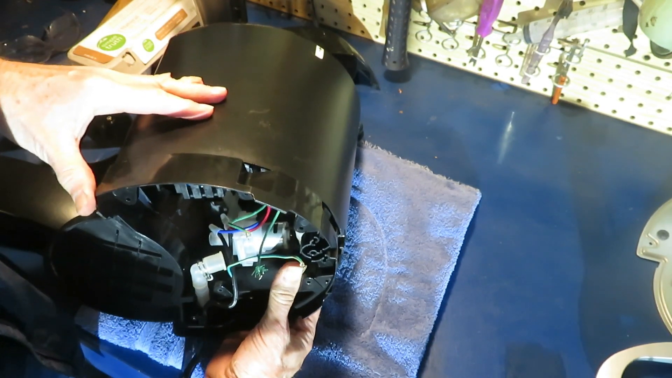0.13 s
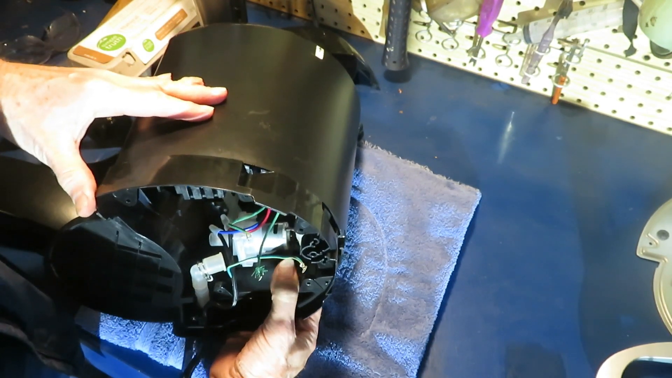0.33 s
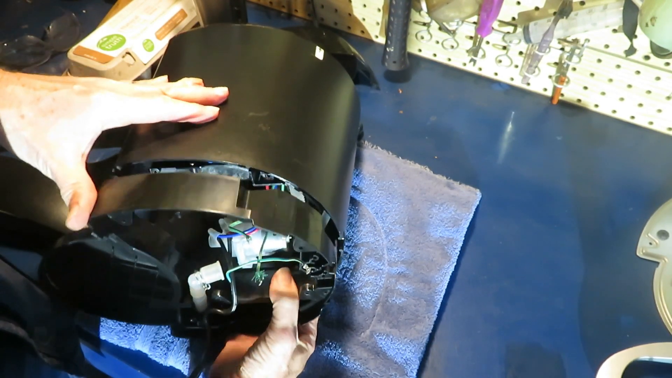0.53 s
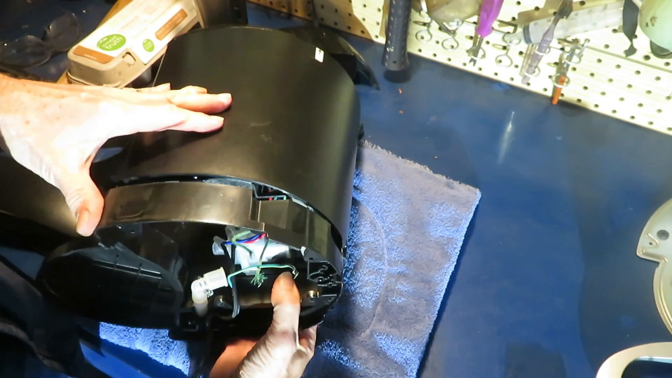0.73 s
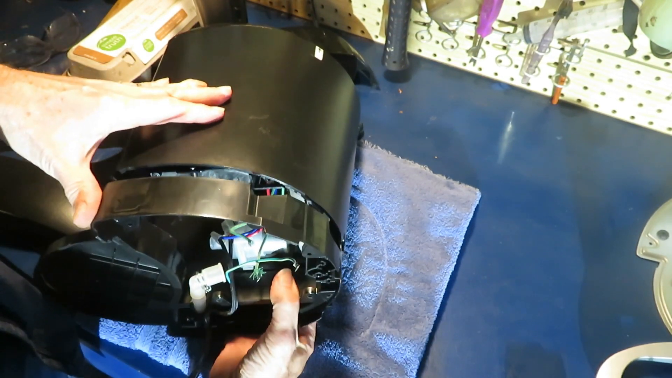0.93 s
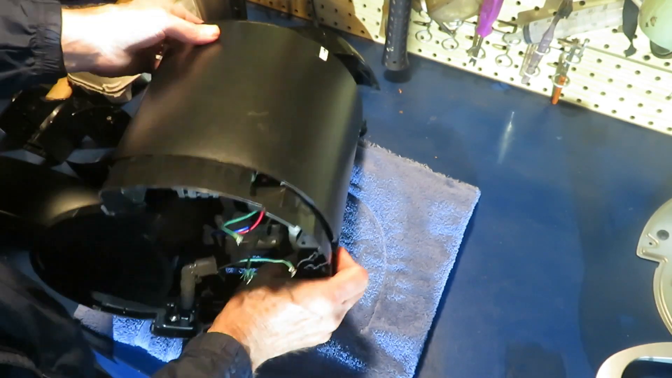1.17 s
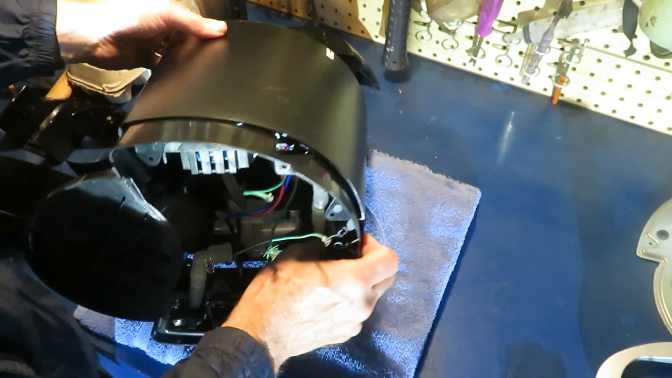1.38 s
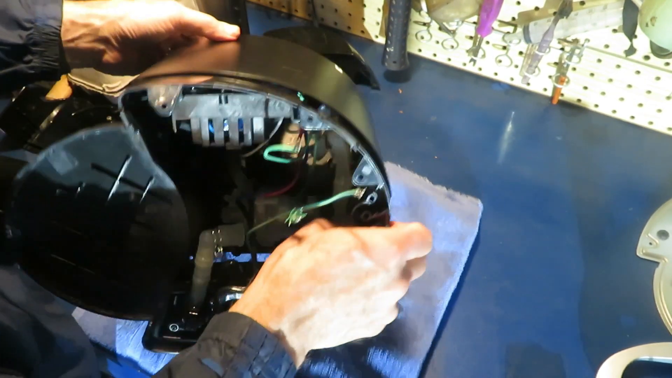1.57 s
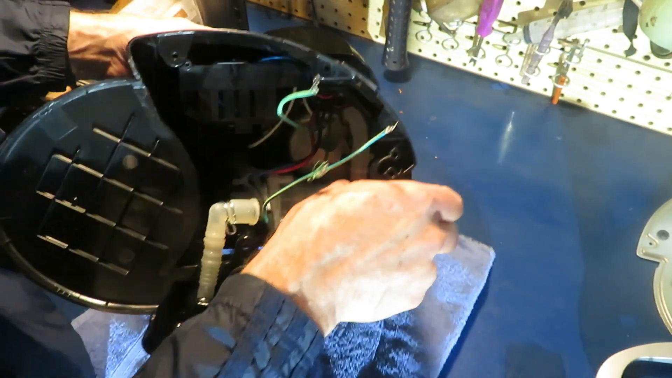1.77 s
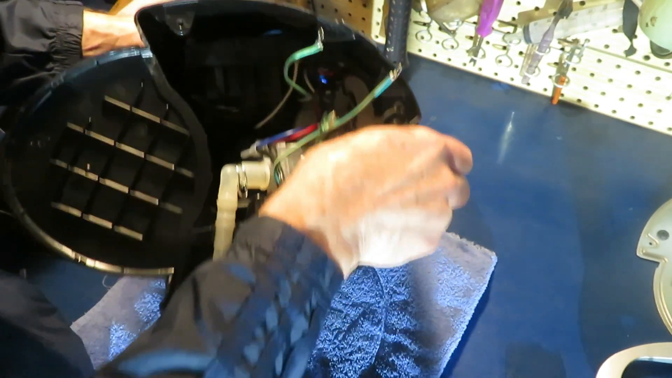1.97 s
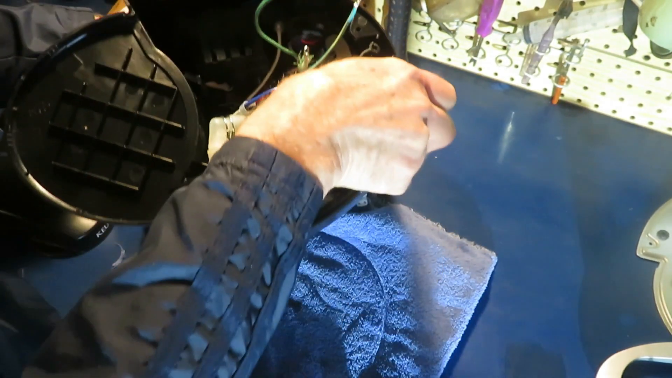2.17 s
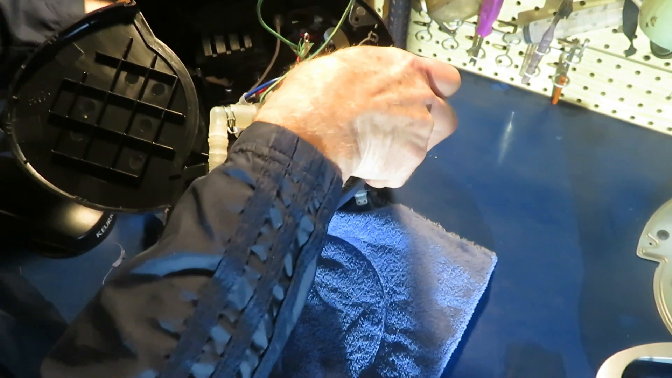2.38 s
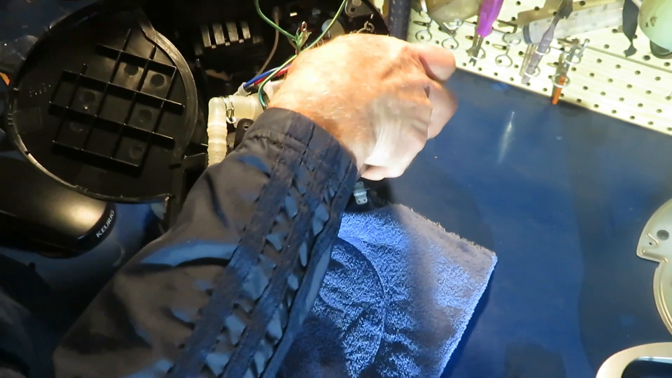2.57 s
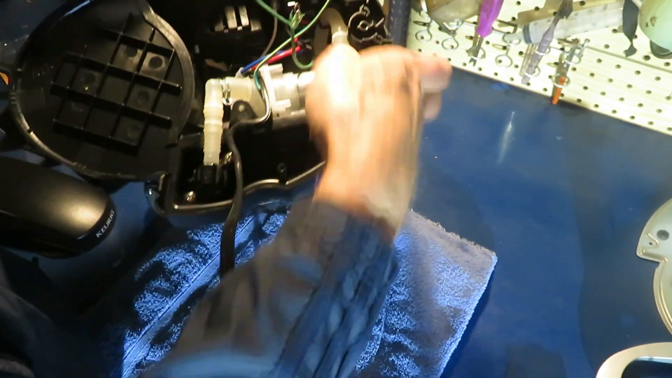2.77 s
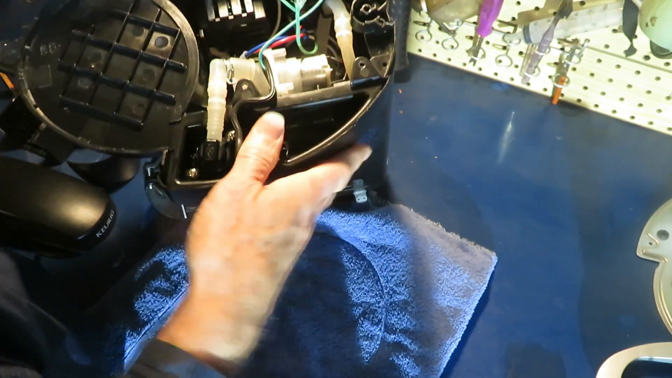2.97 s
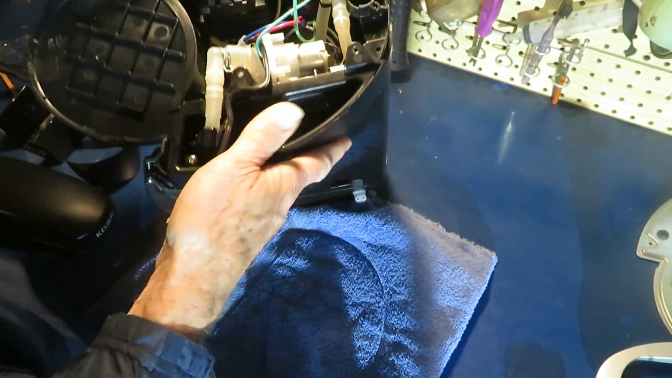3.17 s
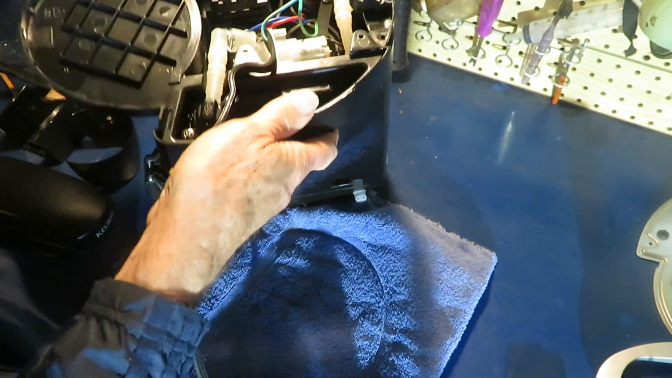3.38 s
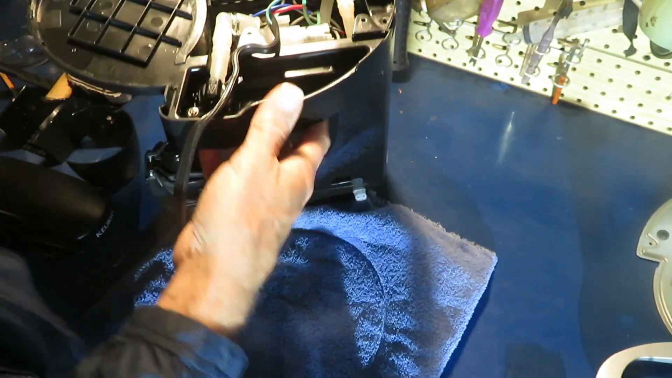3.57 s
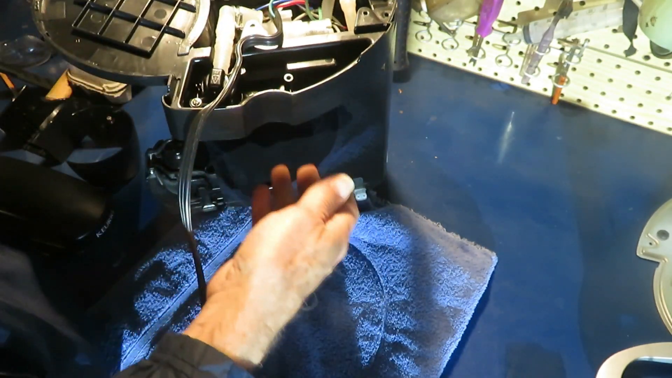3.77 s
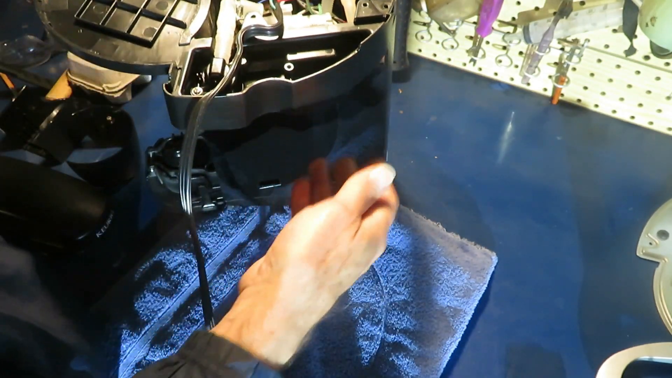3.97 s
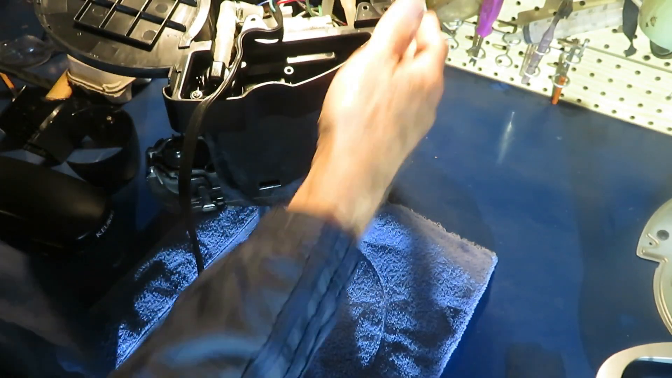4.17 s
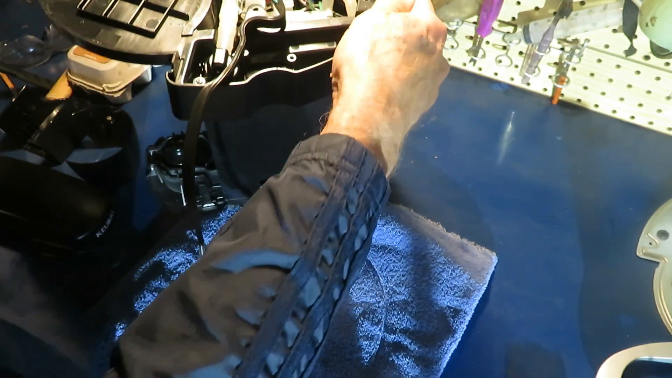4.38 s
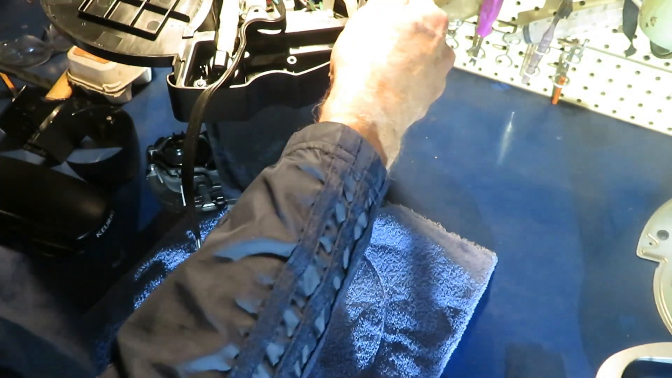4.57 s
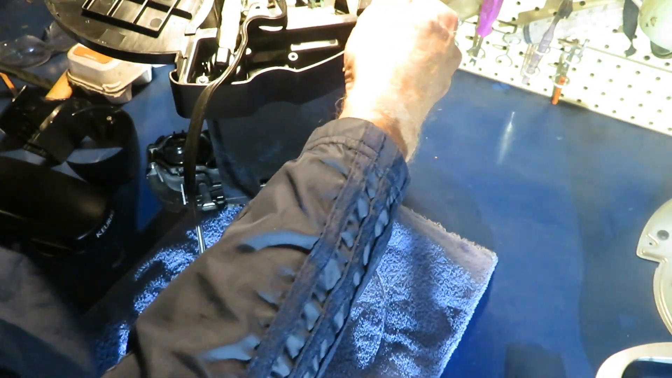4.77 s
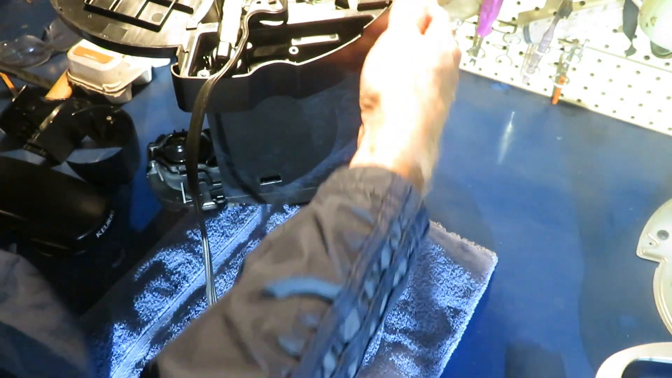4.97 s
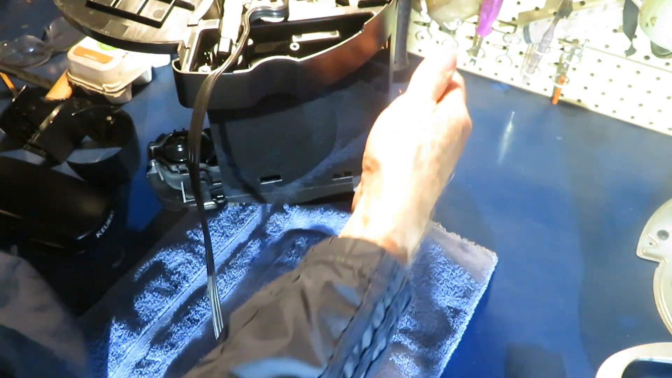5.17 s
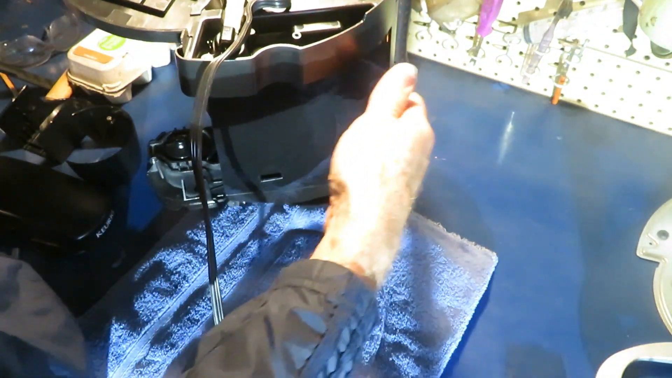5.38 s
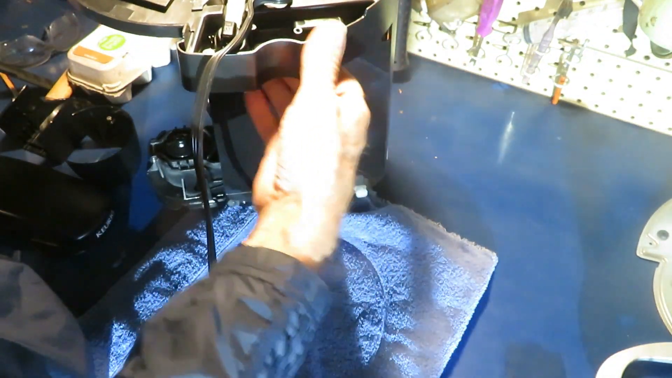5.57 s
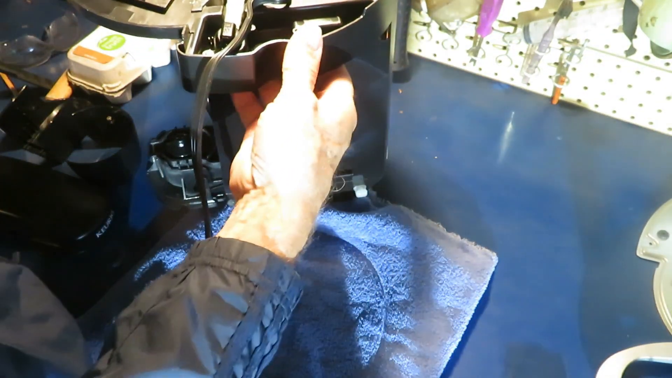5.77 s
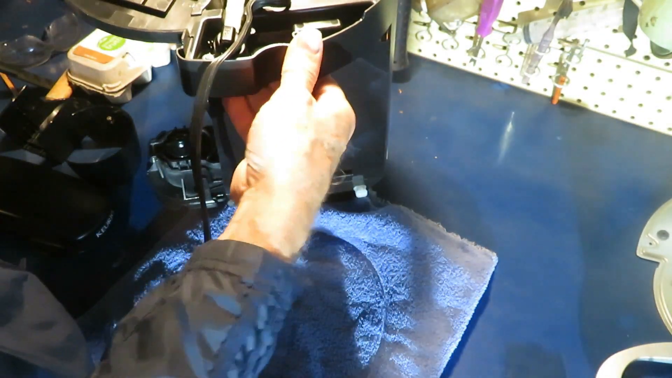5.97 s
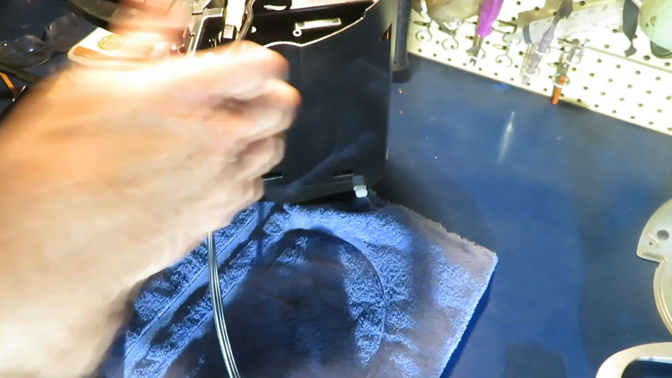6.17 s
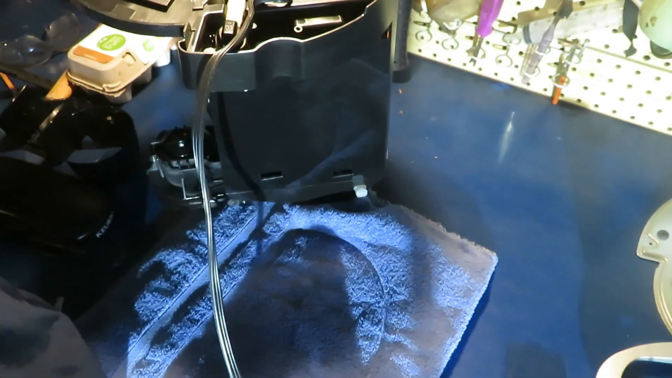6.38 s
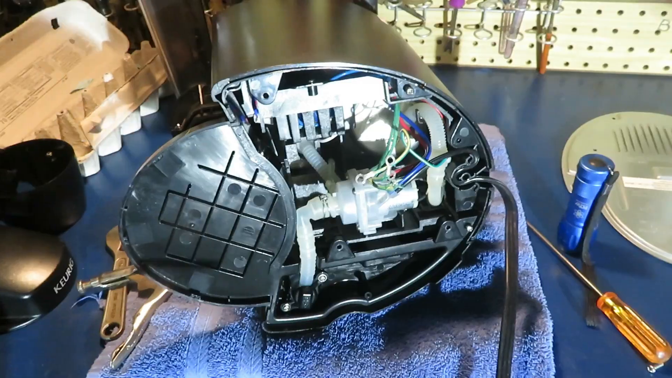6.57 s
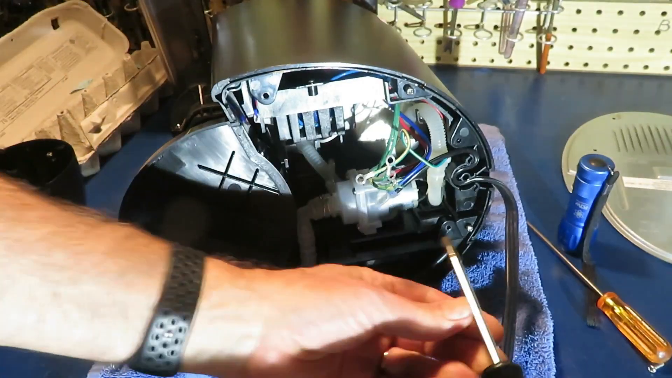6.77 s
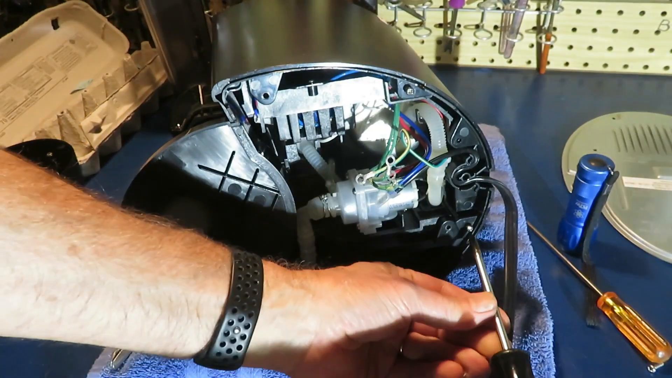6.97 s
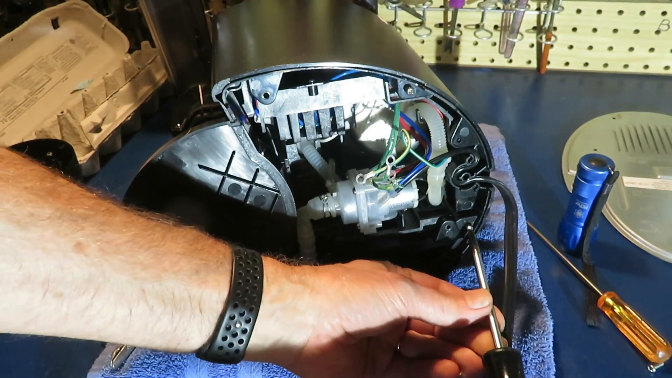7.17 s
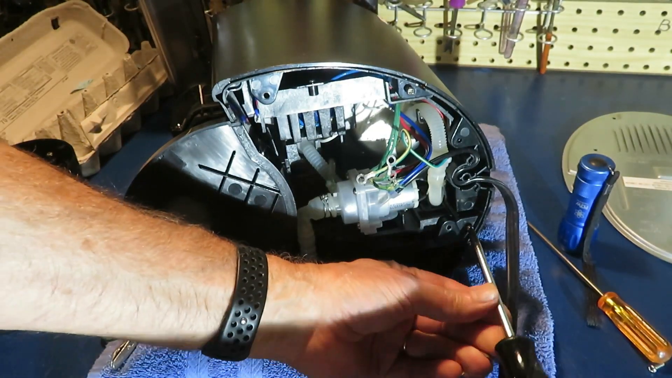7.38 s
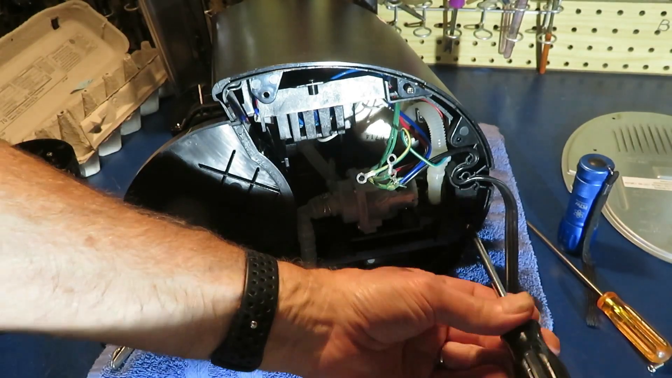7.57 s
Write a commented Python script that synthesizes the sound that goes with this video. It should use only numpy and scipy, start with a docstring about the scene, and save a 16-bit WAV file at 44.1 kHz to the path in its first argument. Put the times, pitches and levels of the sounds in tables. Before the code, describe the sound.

Close stereo pickup at a workbench in a small room. A hollow plastic appliance shell pops apart with bright cracks, then knocks, thuds and clicks as it is turned over, while a sleeve and hand rub and scuff it. Low rumble and hum lie beneath. Late on, the background cuts abruptly to near-silence, and a screwdriver taps very faintly inside the casing.

```python
"""Prying open a hollow plastic casing

The casing of a small appliance is pried open and turned over on a towel at a workbench in a small room.
Snaps, knocks and taps are short bursts of force that ring the shell; a sleeve and a hand rub it as
trembling noise. Coloured noise makes the room air and a low hum, and a sine makes a deep drone.
Near the end the background drops away abruptly and a screwdriver taps faintly in the casing."""
import sys
import numpy as np
from scipy import signal
from scipy.fft import rfft, irfft, next_fast_len
from scipy.io import wavfile
from scipy.ndimage import map_coordinates

SR = 44100
rng = np.random.default_rng(int(sys.argv[2]) if len(sys.argv) > 2 else 0)


def persist_wave(psi):
    """Save psi, clipped to +-1, as 16-bit WAV."""
    counts = np.round(np.clip(psi, -1, 1) * 32767).astype(np.int16)
    wavfile.write(sys.argv[1], SR, np.atleast_2d(counts).T)


N = 336924

# edges of the bands in which a touch gets its colour [Hz]
BAND_EDGES = [150, 450, 900, 2000, 4000, 8000, 16000]
# main ringing tones (modes) of the casing: (frequency [Hz], width [Hz], relative level [dB])
SHELL_MODES = [(213.3, 25, 0), (302, 47, 2.5), (407, 19, -1), (431.3, 56, -7.5), (574.6, 20, -10),
               (679, 30, 4.5), (768, 10, -13), (854, 35, -17), (1055, 39, 3.5), (1146, 50, -15),
               (1600, 81, 3.5), (1737, 88, -11), (2200, 140, -14.5), (2529, 57, -1.5), (2860, 39, -16),
               (3690, 100, -8.5), (3986, 96, -22.5), (5230, 85, -27), (6344, 160, -38)]
# colour of cloth and skin on plastic: (frequency [Hz], relative level [dB per Hz])
CLOTH_COLOUR = [(180, -32), (300, -8.5), (379, -1.5), (486, -9), (614, -2), (737, -14.5), (870, -0.5),
                (1040, -6.5), (2320, -7.5), (4300, -14.5), (6200, -19), (9550, -24.5), (13500, -23.5),
                (15000, -37), (16000, -57.5)]
# colour of knocks and light finger touches: (frequency [Hz], relative level [dB])
KNOCK_BANDS = [(640, 0), (1340, -0.5), (2830, -5.5), (5660, -16), (11300, -27.5)]
DROP_S = 6.57  # when the background drops away


def amp(db):
    """Turn decibels into a gain."""
    return 10 ** (np.asarray(db) / 20)


def unit(x):
    """Scale a sound to an average (rms) level of 1."""
    return x / np.sqrt(np.mean(x ** 2) + 1e-20)


def along(points, hz):
    """Read a curve of (Hz, value) points, straight on a log frequency axis."""
    f, v = np.transpose(points)
    return np.interp(np.log(hz + 1), np.log(f + 1), v)


def curves(rows):
    """Give one value per sample for each column after the time."""
    s, *cols = np.transpose(rows)
    return [np.interp(np.arange(N) / SR, s, c) for c in cols]


def wobble(rate):
    """A smooth random curve with this many random points a second."""
    points = rng.standard_normal(int(N * rate / SR) + 4)
    return map_coordinates(points, [np.arange(N) * rate / SR])


def filtered(x, response):
    """Multiply the spectrum of a sound by a response that depends on frequency."""
    m = next_fast_len(N + SR // 2)
    return irfft(rfft(x, m) * response(np.fft.rfftfreq(m, 1 / SR)), m)[..., :N]


def noise(spectrum):
    """Steady coloured noise with an average (rms) level of 1."""
    return unit(filtered(rng.standard_normal(N), lambda hz: amp(along(spectrum, hz))))


def coloured(x, points):
    """Colour a short sound by (Hz, dB) points without smearing it backwards (minimum phase)."""
    n = len(x)
    cepstrum = irfft(np.log(amp(along(points, np.fft.rfftfreq(n, 1 / SR)))), n)
    cepstrum[1:n // 2] *= 2
    cepstrum[n // 2 + 1:] = 0
    return irfft(rfft(x) * np.exp(rfft(cepstrum)), n)


def dying(t60s, size):
    """Noise in which each frequency dies away at its own speed."""
    hz, t, z = signal.stft(rng.standard_normal(size), SR, nperseg=128)
    fade = amp(-60 * t / along(t60s, hz)[:, None])
    return signal.istft(z * fade, SR, nperseg=128)[1][:size]


def swells(rows, fade_db_per_s):
    """Gain that rises to each (s, dB) crest and falls away, both at a steady slope."""
    t = np.arange(N) / SR
    return sum(amp(db - fade_db_per_s * np.abs(t - s)) for s, db in rows)


def busy():
    """1 while the work is loud, 0 once the background has dropped away."""
    return np.clip((DROP_S - np.arange(N) / SR) / .004, 0, 1)


def drone():
    """A deep sine that swells with small wobbles, then sinks in pitch."""
    pitch_hz, sag_from_s, sag_hz_per_s = 32, 6.5, 3.6
    full_db, full_at_s, rise_db_per_s = -42.5, 5.55, 12.5
    t = np.arange(N) / SR
    hz = pitch_hz - sag_hz_per_s * np.maximum(t - sag_from_s, 0)
    level_db = full_db - rise_db_per_s * np.maximum(full_at_s - t, 0)
    return amp(level_db + 1.8 * wobble(4.1)) * unit(np.sin(2 * np.pi * np.cumsum(hz) / SR))


def hum():
    """A low hum made of narrow noise, which swells above its resting level."""
    # colour of the hum: (frequency [Hz], relative level [dB per Hz])
    hum_colour = [(60, -37.5), (78, -12.5), (85, -6), (92, -10), (110, -13.5), (135, -23), (300, -84.5)]
    # crests of its swells: (time [s], level [dB])
    hum_crests = [(3.05, -46), (4.5, -43)]
    resting_db, fade_db_per_s = -56, 21.5
    return (amp(resting_db) + swells(hum_crests, fade_db_per_s)) * noise(hum_colour)


def room_air():
    """The rumble of the room's air is noise, strongest in the lows, at a slowly changing level."""
    # loudness of the air: (time [s], level [dB])
    air_levels = [(1.0, -45), (2.1, -42.5), (6.55, -42)]
    # colour of the air: (frequency [Hz], relative level [dB per Hz])
    air_colour = [(15, -33), (25, -5.5), (108, -2), (175, -4.5), (223, -17.5), (256, -7.5), (317, -14.5),
                  (384, -15.5), (463, -16.5), (516, -21), (714, -18), (1230, -21.5), (8360, -40.5),
                  (14000, -48.5), (16000, -65)]
    level_db, = curves(air_levels)
    return amp(level_db) * noise(air_colour) * busy()


def still_room():
    """After the drop, a faint rumble and hiss fade in; both are noise, and the rumble swells once."""
    # colour of the rumble: (frequency [Hz], relative level [dB per Hz])
    rumble_colour = [(20, -13.5), (40, -6), (55, 4.5), (75, -5), (140, -10.5), (250, -33), (600, -69)]
    # colour of the hiss: (frequency [Hz], relative level [dB per Hz])
    hiss_colour = [(120, -29), (200, 2), (2050, -14), (2420, -12.5), (2910, -14.5), (3370, -15.5),
                   (13300, -31), (15100, -30), (16000, -41)]
    # crest of the rumble's swell: (time [s], level [dB])
    rumble_crest = [(7.0, -60)]
    rumble_db, hiss_db, swell_slope_db_per_s = -65.5, -69.5, 68
    full_at_s, rise_db_per_s = 6.94, 34
    t = np.arange(N) / SR
    # a blink of silence comes first
    fade_in = np.clip((t - DROP_S - .035) / .008, 0, 1)
    fade_in = fade_in * amp(-rise_db_per_s * np.maximum(full_at_s - t, 0))
    rumble_gain = amp(rumble_db) + swells(rumble_crest, swell_slope_db_per_s)
    return (rumble_gain * noise(rumble_colour) + amp(hiss_db) * noise(hiss_colour)) * fade_in


def background(diffuse_db=5):
    """Room air, hum and drone, then the still room; air and stillness also have a diffuse part."""
    lows = (drone() + hum()) * busy()
    shared = room_air() + still_room() + lows
    return np.array([shared, amp(diffuse_db) * (room_air() + still_room())])


def touch_db(colour, db, bright_db=0, depth_db=0):
    """Band levels of a touch: a harder one has more treble, one on a wide panel has more bass."""
    pivot_hz = 640  # brightness tilts the sound above this, depth lifts the octave below
    centres = np.sqrt(np.multiply(BAND_EDGES[:-1], BAND_EDGES[1:]))
    octaves = np.log2(centres / pivot_hz)
    tilt = bright_db * np.maximum(octaves, 0)
    bass = depth_db * np.clip(-octaves, 0, 1)
    return db + along(colour, centres) + tilt + bass


def voiced(x, band_db):
    """Colour a blow to bring its first 20 ms close to the given level in each band."""
    hz = np.fft.rfftfreq(2048, 1 / SR)
    centres = np.sqrt(np.multiply(BAND_EDGES[:-1], BAND_EDGES[1:]))
    fade = signal.windows.tukey(1764, .08)[882:]
    for _ in range(2):
        power = np.abs(rfft(x[:882] * fade, 2048)) ** 2 / (1024 * 882)
        has_db = 10 * np.log10(np.histogram(hz, BAND_EDGES, weights=power)[0] + 1e-20)
        x = coloured(x, np.column_stack([centres, band_db - has_db]))
    return x


def contact(close_s, rings_hz, band_db, modes_db, ring_db, second_db, ring_t60, chatter_db, room_db,
            size=12288):
    """A first strike and a brief chatter ring the shell; returns the sound and its diffuse scatter."""
    # the shell's many lesser modes: (frequency [Hz], relative level [dB])
    wall_colour = [(30, -26), (110, -25), (200, -1.5), (330, 2), (600, 4), (1000, -6), (2800, -7.5),
                   (4000, -18), (7000, -32.5), (12500, -48), (16000, -56)]
    # how fast these modes die: (frequency [Hz], time to fall 60 dB [s])
    wall_fades = [(200, 0.16), (600, 0.15), (1500, 0.099), (3000, 0.074), (6000, 0.078), (12000, 0.021)]
    # how fast the room's echo dies: (frequency [Hz], time to fall 60 dB [s])
    room_fades = [(150, 0.5), (600, 0.38), (2000, 0.37), (5000, 0.18), (12000, 0.29)]
    t = np.arange(size) / SR

    def sine(hz):
        return rng.choice([-1, 1]) * np.sin(2 * np.pi * hz * t)

    # each touch finds the main modes at slightly different levels and pitches
    modes = sum(amp(db + rng.normal(0, 0.98)) * sine(hz * rng.normal(1, .012)) * np.exp(-np.pi * width * t)
                for hz, width, db in SHELL_MODES)
    body = unit(coloured(dying(wall_fades, size), wall_colour)) + amp(modes_db) * unit(modes)
    # the struck panel itself radiates one short push
    push = coloured(rng.standard_normal(size) * t * np.exp(-t / 0.0014), wall_colour)
    # the edges skid for a moment before they seat; the slower the touch, the more it skids
    skid = t / max(close_s, 1e-4)
    force = rng.standard_normal(size) * np.sqrt(skid) * np.exp(-skid)
    force *= amp(chatter_db) * (close_s / 0.0028) ** 0.5 / np.linalg.norm(force)
    force[0] += 1  # the first strike
    struck = unit(body) + amp(-5.0) * unit(push)
    blow = unit(signal.fftconvolve(struck, force)[:size])
    # the spot that is touched favours two rings; ring_t60 [s] holds at 600 Hz, higher rings die faster
    for hz, db in zip(rings_hz, (ring_db, second_db)):
        ring = sine(hz) * (1 - np.exp(-skid)) * amp(-60 * t / ring_t60 * (hz / 600) ** 0.69)
        blow = blow + amp(db + 0.51 * along(wall_colour, hz)) * unit(ring)
    blow = voiced(blow, band_db)

    def through(response):
        return signal.fftconvolve(blow, response / np.linalg.norm(response))[:size]

    room = through(dying(room_fades, size) * (1 - np.exp(-(t / 0.027) ** 2)))
    scatter = through(rng.standard_normal(size) * np.exp(-t / .012))
    return np.array([blow + amp(room_db) * room, scatter])


def thuds():
    """The casing settles dully, often just after a knock: soft touches with little treble."""
    # (time [s], ring [Hz], relative level [dB], brightness [dB per octave], depth [dB])
    thud_rows = [(0.231, 407, -59.5, 2, 12.5), (0.547, 197, -39, -10, 3), (0.737, 435.5, -28, -0.5, 0.5),
                 (0.762, 310, -39, 0, 1), (1.166, 257, -45, -7.5, 3.5), (1.398, 383, -29, -3.5, 2.5),
                 (1.43, 299, -39, 1.5, 6), (1.63, 286, -42, -2.5, 5), (1.841, 355, -45, 2, 3),
                 (1.93, 555, -46.5, 1.5, 0.5), (2.235, 465, -41.5, 1.5, -5), (2.676, 592, -23.5, -3.5, -6),
                 (2.732, 250, -45, 0.5, 4), (2.832, 402, -43, 0.5, 4.5), (3.195, 208, -27.5, 2, 5),
                 (3.284, 206, -31.5, 0, 4.5), (4.305, 363, -45.5, 2.5, 5), (4.461, 280, -52, 4.5, 4.5),
                 (5.995, 446, -45.5, -3.5, 7), (6.48, 387, -50.5, 0, 13)]
    # colour: (frequency [Hz], relative level [dB])
    thud_bands = [(640, 0.5), (1340, -6), (2830, -17.5), (5660, -27.5), (11300, -40.5)]
    close_s, second_over_first = 0.0046, 1.3
    for s, hz, db, bright_db, depth_db in thud_rows:
        yield s, close_s, (hz, hz * second_over_first), touch_db(thud_bands, db, bright_db, depth_db)


def knocks():
    """Hard parts knock on the shell, each with its own closing time and pair of rings."""
    # (time [s], time for the touch to close [s], first ring [Hz], second ring [Hz],
    #  relative level [dB], brightness [dB per octave], depth of the panel's bass [dB])
    knock_rows = [(0.533, 0.0036, 412, 606, -38.5, 0, 3), (0.7031, 0.00049, 642, 520, -19.5, -5, -10),
                  (1.248, 0.0012, 413, 318, -39.5, -0.5, 1.5),
                  (1.3675, 0.0014, 1198, 379, -20.5, 1.13, -0.5), (1.745, .0053, 616, 363, -33.5, -3.5, 2),
                  (1.759, .0018, 720, 560, -35.5, -2.5, -2), (1.789, 0.0036, 553, 808, -24.5, -3.5, -12.5),
                  (2.667, 0.0023, 555, 730, -26, 0.14, -2.5), (2.848, .0015, 273, 1770, -40, 3, 4.5),
                  (3.125, 0.00059, 445, 269, -24.5, -1.4, 5.5), (3.183, 0.0023, 1120, 463, -32.5, 0, 2.5),
                  (3.308, .002, 251, 187, -35.5, 0.15, 13), (3.4019, 0.0021, 568, 1840, -24.5, -0.5, -0.5),
                  (3.499, 0.0034, 1330, 1040, -29.5, -3.5, 1), (3.5383, 0.00032, 567, 770, -16, -1, -6),
                  (4.142, 0.0017, 376, 598, -38, -.3, 0.5), (4.557, .0035, 379, 1770, -35, 0.9, 1.5),
                  (4.9505, 0.00053, 409, 187, -38, -3, 11.5), (5.59, 0.0035, 643, 1270, -43, 0.4, 0),
                  (5.762, 0.0027, 940, 282, -40.5, 0.6, 5.5), (6.057, 0.0025, 280, 453, -38, -2.5, 4.5),
                  (6.411, .002, 375, 812, -33, -5, -3), (6.455, .004, 392, 620, -35, -2.3, -1)]
    for s, close_s, first_hz, second_hz, db, bright_db, depth_db in knock_rows:
        yield s, close_s, (first_hz, second_hz), touch_db(KNOCK_BANDS, db, bright_db, depth_db)


def catches():
    """A springy catch lets go abruptly with a bright crack, which also knocks the shell."""
    # (time [s], ring [Hz], relative level [dB])
    catch_rows = [(0.7029, 2980, -24.5), (1.3678, 2108, -24), (4.143, 3060, -41)]
    # colour: (frequency [Hz], relative level [dB])
    catch_bands = [(260, -20.5), (640, -14), (1340, -8.5), (2830, 1), (5660, -12), (11300, -20)]
    close_s, second_over_first = 0.0012, 1.1
    for s, hz, db in catch_rows:
        yield s, close_s, (hz, hz * second_over_first), touch_db(catch_bands, db)


def clicks():
    """Small, light parts click: touches with little bass and a lower second ring."""
    # (time [s], ring [Hz], relative level [dB], brightness [dB per octave])
    click_rows = [(1.358, 2420, -31, 0), (1.6101, 550, -55, 3.5), (1.78, 1980, -31, -5.5),
                  (2.073, 2880, -39.5, -1), (2.207, 807, -40, -1), (2.379, 1750, -49, -1),
                  (2.901, 1050, -41.5, -2), (3.423, 795, -40.5, 0.5), (3.484, 1650, -30, 0.63),
                  (3.856, 3207, -55, 0.5), (4.385, 1110, -42, -3), (5.055, 3920, -47.5, 2)]
    # colour: (frequency [Hz], relative level [dB])
    click_bands = [(260, -7), (640, -0.5), (2830, -1), (5660, -9), (11300, -19)]
    close_s, second_over_first = .0045, .7
    for s, hz, db, bright_db in click_rows:
        yield s, close_s, (hz, hz * second_over_first), touch_db(click_bands, db, bright_db)


def friction(grain_db, shell_db):
    """Cloth and skin on plastic: a hiss that trembles with tiny slips and faintly rings the shell."""
    hiss = noise(CLOTH_COLOUR) * amp(grain_db * wobble(500))
    rung = sum(signal.lfilter(*signal.iirpeak(hz, hz / width, SR), hiss) for hz, width, db in SHELL_MODES)
    return unit(hiss + amp(shell_db) * unit(rung))


def rubbing(diffuse_db=-3, snag_size=0.77):
    """Sleeve and hand slide over the shell with uneven pressure, catching on small edges; scuffs join."""
    # slides: (start [s], length [s], level before the trembling [dB])
    slide_rows = [(1.808, 0.94, -52), (2.553, 0.89, -46), (4.02, .46, -44.5), (5.648, 0.72, -55.5),
                  (6.173, 0.39, -44)]
    attack_s, release_s = 0.19, 0.12
    t = np.arange(N) / SR
    pressure = sum(amp(db) * np.clip(np.minimum((t - s) / attack_s, (s + length - t) / release_s), 0, 1)
                   for s, length, db in slide_rows)
    # about 30 snags a second, each dying within a few milliseconds
    snags = (rng.random(N) < 30 / SR) * rng.uniform(.3, 2, N)
    snags = signal.lfilter([1], [1, -np.exp(-1 / (.004 * SR))], snags)
    tremble = amp(1.3 * wobble(60)) * (1 + snag_size * snags)
    level = pressure * tremble * busy()

    def stroke():
        return level * friction(grain_db=1.5, shell_db=-12.5) + scuffs()

    return np.array([stroke(), amp(diffuse_db) * stroke()])


def fumbles(count=4):
    """Fingers shift their grip: light touches at random times, each favouring two shell modes."""
    # (from [s], to [s], middle of the random levels [dB], brightness [dB per octave], depth [dB])
    grip_changes = [(2.087, 2.347, -50.5, 1, -0.5), (4.4, 4.72, -49, -2.5, 6.5),
                    (6.15, 6.403, -49, -2.5, 7)]
    close_s, scatter_db = 0.0056, 4.5
    for start, end, db, bright_db, depth_db in grip_changes:
        for k in range(count):
            s = start + (end - start) * (k + rng.random()) / count
            rings_hz = rng.choice([hz for hz, width, level in SHELL_MODES], size=2)
            touch_level_db = db + rng.normal(0, scatter_db)
            yield s, close_s, rings_hz, touch_db(KNOCK_BANDS, touch_level_db, bright_db, depth_db)


def scuffs(size=8192):
    """Skin and cuff scuff the rim: short, harder strokes swell and fade with a rough squeaky band."""
    # (start [s], length [s], level before the swell and fade [dB], squeaky band [Hz],
    #  its share [dB], treble lift [dB])
    scuff_rows = [(2.491, 0.069, -38.5, 1700, -5, 1.5), (2.635, 0.076, -36.5, 2700, -3, 6),
                  (2.692, .15, -46.5, 4160, -2, 6.5), (3.645, .11, -46, 1800, -6, 4.5),
                  (4.35, 0.085, -46, 2420, -18, 9.5), (5.048, .057, -39.5, 4040, -3, 5),
                  (6.04, 0.13, -41, 2340, 2, 5.5), (6.105, 0.091, -37, 2670, -26.5, 6.5),
                  (6.291, 0.06, -43.5, 1660, 0, 5), (6.337, 0.1, -51.5, 2300, -10, 12)]
    crest = 0.4  # place of the loudest moment, as a part of the length
    out, t = np.zeros(N + SR), np.arange(size) / SR
    for s, length, db, hz, squeak_db, lift_db in scuff_rows:
        roughness = signal.resample(rng.standard_normal(64), size)
        slips = rng.standard_normal(size) * amp(1.9 * roughness)
        hiss = coloured(coloured(slips, CLOTH_COLOUR), [(2000, 0), (7000, lift_db)])
        squeak = signal.lfilter(*signal.iirpeak(hz, 11, SR), hiss)
        stroke = np.interp(t / length, [0, crest, 1], [0, 1, 0]) ** 0.68
        out[round(s * SR):][:size] += amp(db) * stroke * unit(unit(hiss) + amp(squeak_db) * unit(squeak))
    return out[:N]


def taps():
    """The screwdriver taps one spot inside the casing, so every tap favours the same two rings."""
    # (time [s], relative level [dB])
    tap_rows = [(7.187, -65), (7.306, -64.5), (7.395, -58.5), (7.44, -51.5), (7.573, -61.5), (7.597, -57)]
    # colour: (frequency [Hz], relative level [dB])
    tap_bands = [(260, 0), (640, -8.5), (1340, -9.5), (2830, -14), (5660, -20), (11300, -39.5)]
    # the two favoured rings [Hz]
    tap_rings = (391, 1040)
    for s, db in tap_rows:
        yield s, 0.0047, tap_rings, touch_db(tap_bands, db)


def touches():
    """Every touch on the shell as (time s, closing time s, two rings Hz, band levels dB)."""
    for source in (thuds, knocks, catches, clicks, fumbles, taps):
        yield from source()


def casing():
    """All touches ring the shell; those before the drop are cut off where the background drops away."""
    # knocks are close, so little of their body is diffuse: (frequency [Hz], diffuse level [dB])
    diffuse_share = [(300, -17), (1500, -15), (6000, -11.5), (12000, 3)]
    out = np.zeros((2, N + SR))
    for s, close_s, rings_hz, band_db in touches():
        blow = contact(close_s, rings_hz, band_db, modes_db=-7.0, ring_db=-4.0, second_db=-7.5,
                       ring_t60=0.058, chatter_db=-1.5, room_db=-19.0)
        if s < DROP_S:
            blow = blow[:, :round((DROP_S - s) * SR)]
        out[:, round(s * SR):][:, :blow.shape[1]] += blow
        # an edge grazes, softly and dully, a moment before the parts meet
        fade = np.exp(-np.arange(blow.shape[1]) / SR / 0.0036)
        graze = coloured(blow[0] * fade, [(2000, -14.0), (8000, -29.5)])
        out[0, round((s - rng.uniform(.002, .005)) * SR):][:len(graze)] += graze
    shared, diffuse = amp(1.18) * out[:, :N]
    return np.array([shared, filtered(diffuse, lambda hz: amp(along(diffuse_share, hz)))])


def microphones(shared, diffuse):
    """Two close ports: the left hears a little sooner and louder, and diffuse sound differs between them."""
    # what differs between the ports: (frequency [Hz], level [dB])
    port_difference = [(100, -43), (300, -10), (1000, -13), (2500, -9.5), (5000, -7), (10000, -7)]
    lag_s = 1.75e-5
    side = filtered(diffuse, lambda hz: amp(along(port_difference, hz)))
    ports = np.array([[1], [-1]])  # left, right
    heard = filtered(shared + ports * side, lambda hz: np.exp(1j * np.pi * hz * lag_s * ports))
    return heard * amp(ports * .22)


def scene():
    """Touches, rubbing and background, each as a shared and a diffuse part, reach the microphones."""
    return microphones(*(casing() + rubbing() + background()))


def record(dry):
    """Peaks are rounded off at full scale, then everything above the band limit is removed."""
    top_hz = 15800
    held = dry / (1 + np.abs(dry) ** 8) ** (1 / 8)
    return filtered(held, lambda hz: hz < top_hz)


dry = scene()
out = record(dry)
persist_wave(out)
```